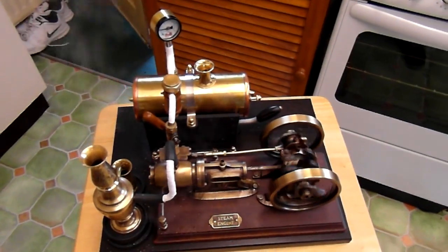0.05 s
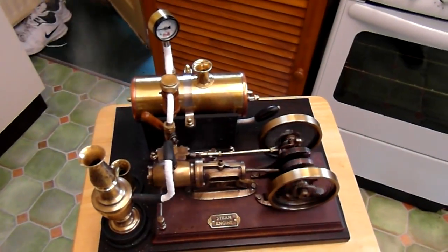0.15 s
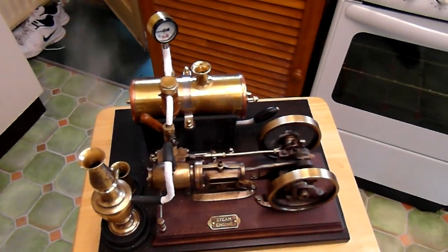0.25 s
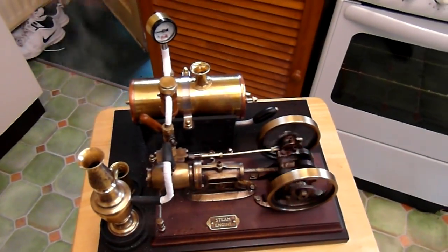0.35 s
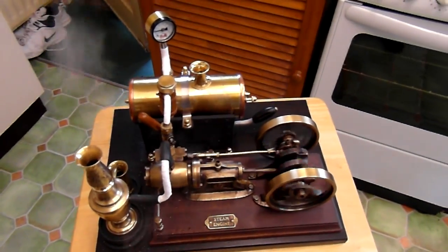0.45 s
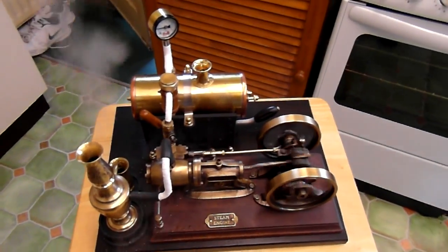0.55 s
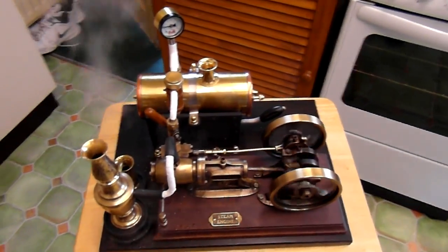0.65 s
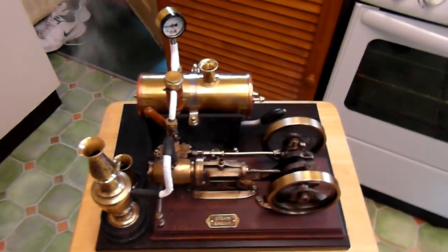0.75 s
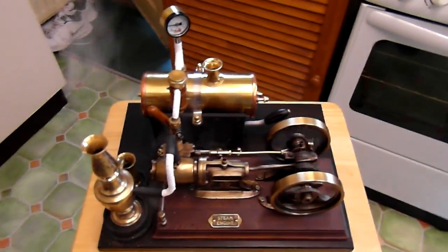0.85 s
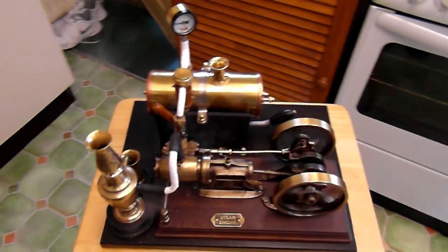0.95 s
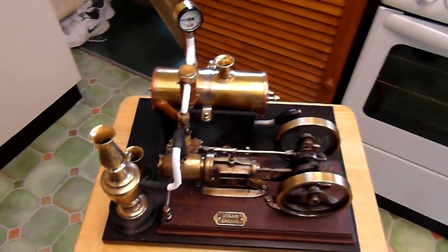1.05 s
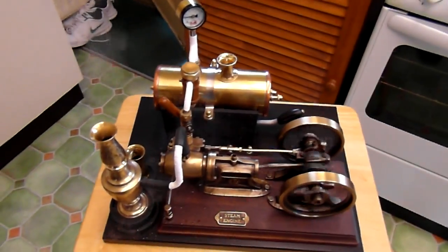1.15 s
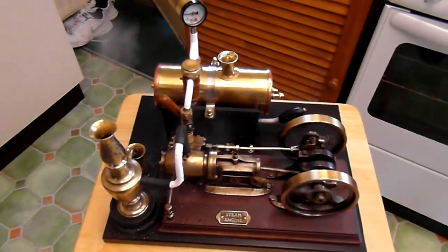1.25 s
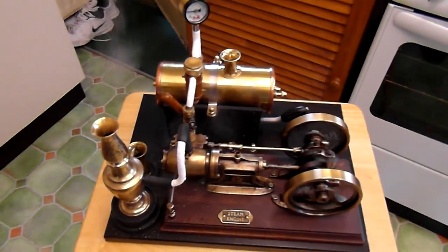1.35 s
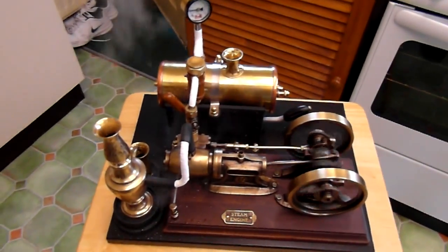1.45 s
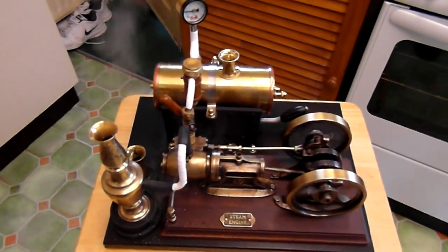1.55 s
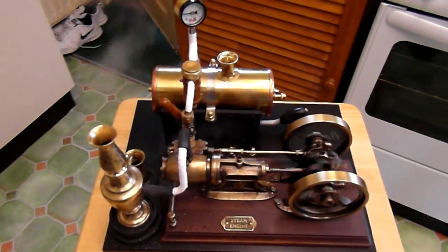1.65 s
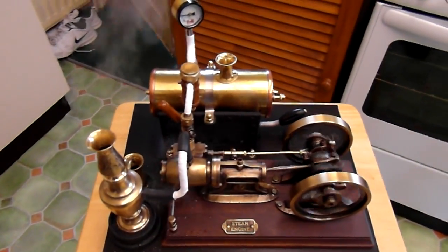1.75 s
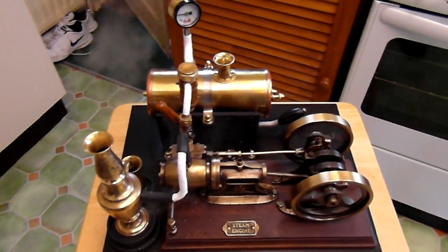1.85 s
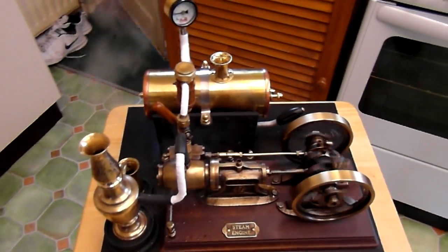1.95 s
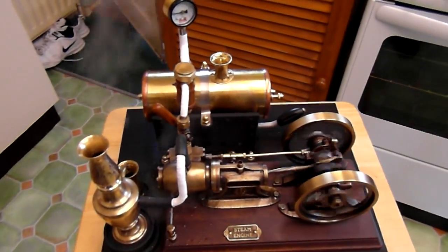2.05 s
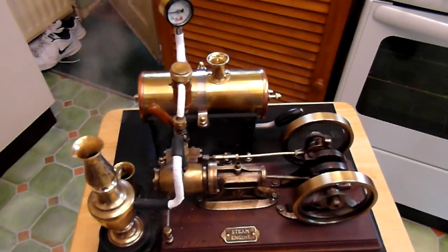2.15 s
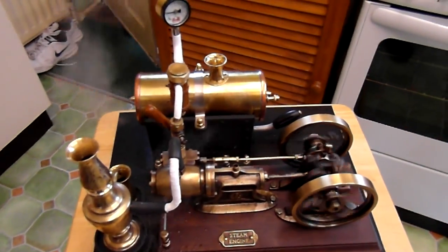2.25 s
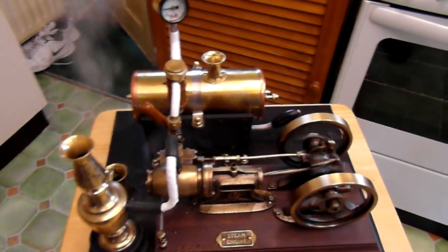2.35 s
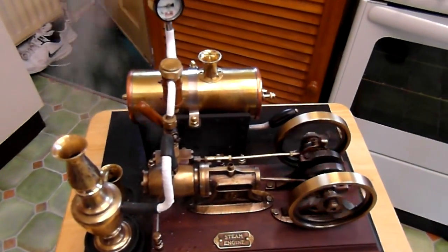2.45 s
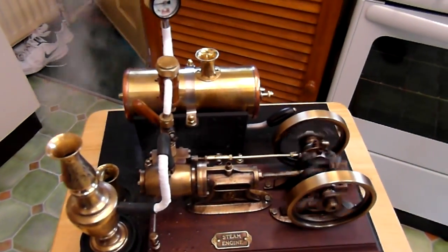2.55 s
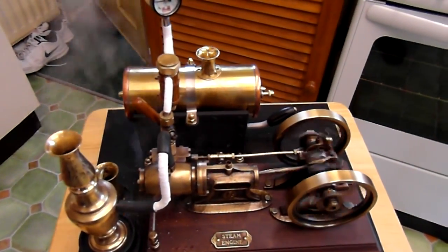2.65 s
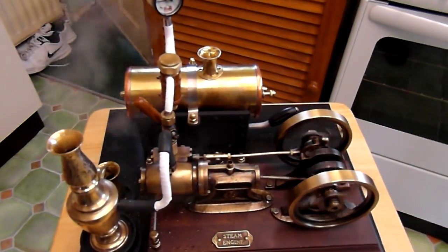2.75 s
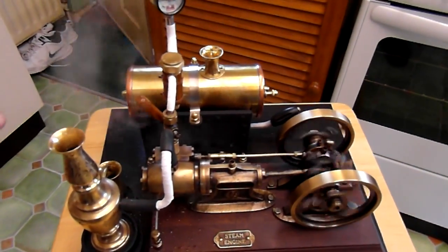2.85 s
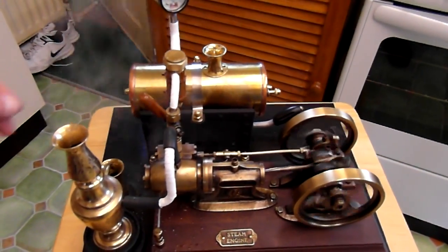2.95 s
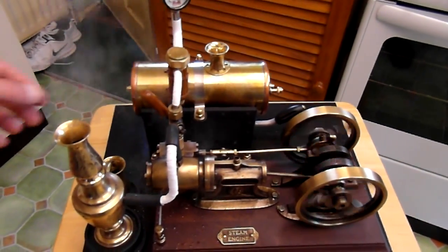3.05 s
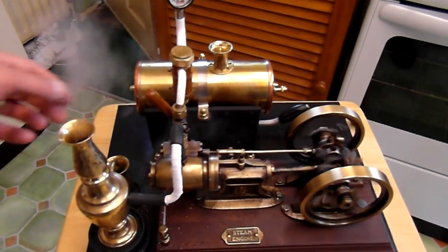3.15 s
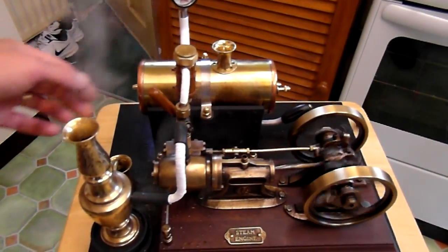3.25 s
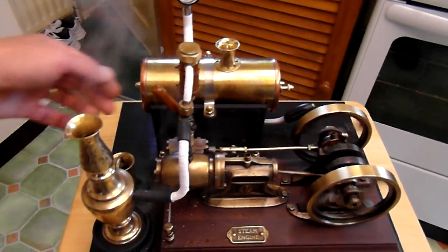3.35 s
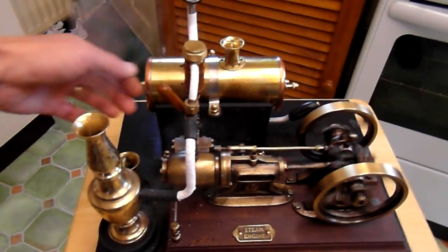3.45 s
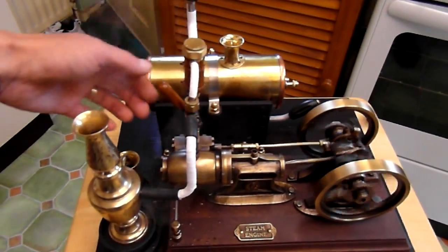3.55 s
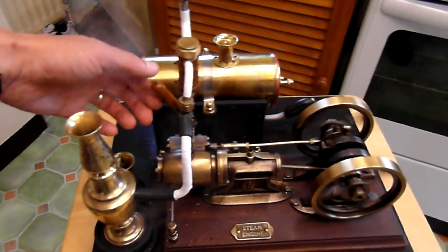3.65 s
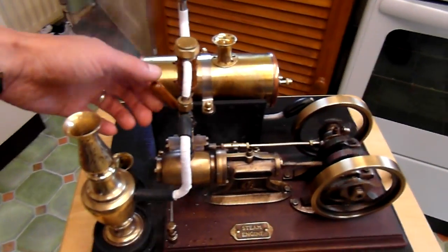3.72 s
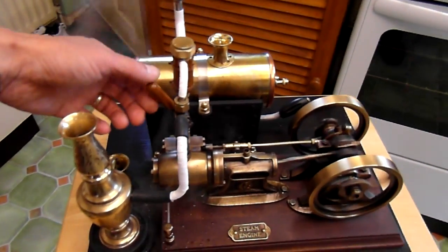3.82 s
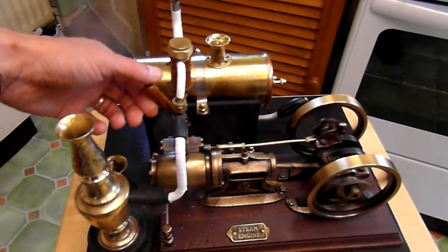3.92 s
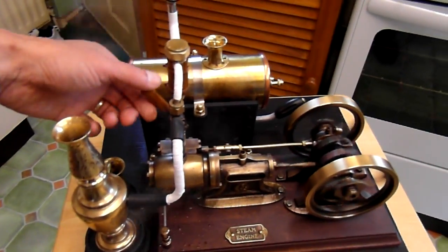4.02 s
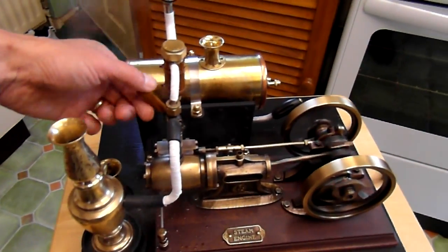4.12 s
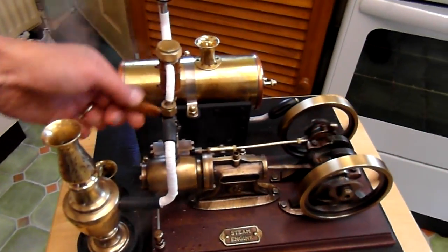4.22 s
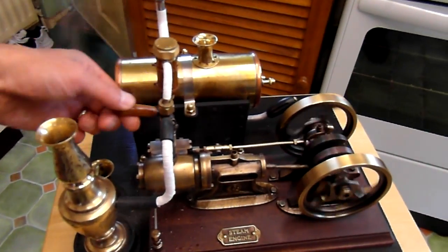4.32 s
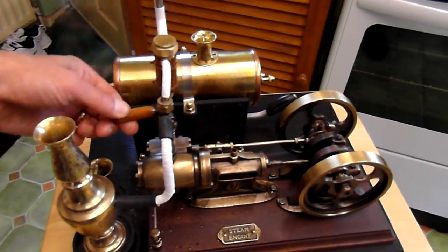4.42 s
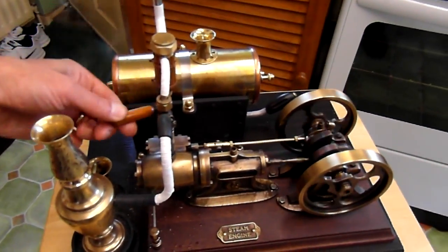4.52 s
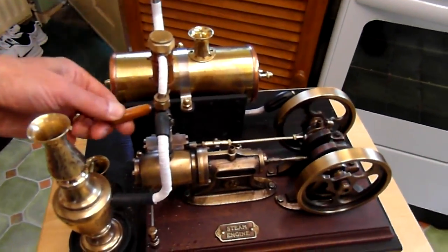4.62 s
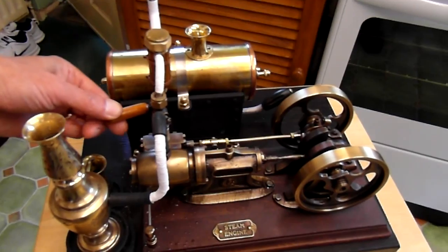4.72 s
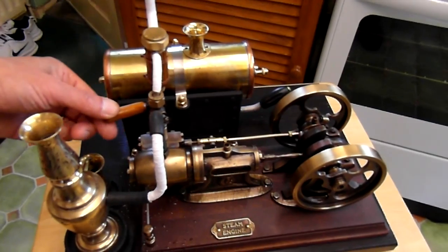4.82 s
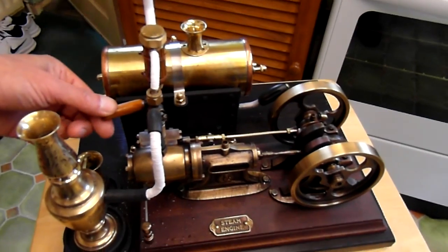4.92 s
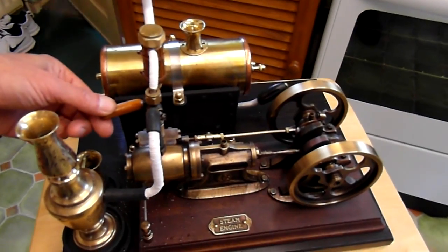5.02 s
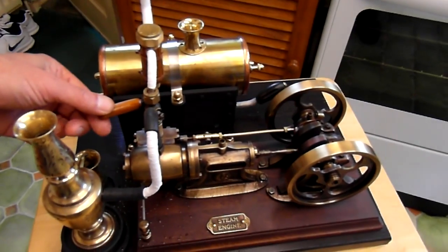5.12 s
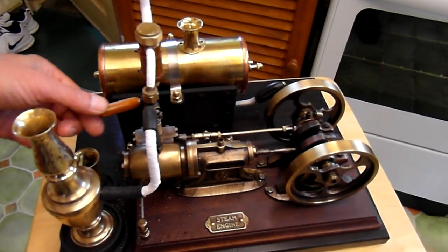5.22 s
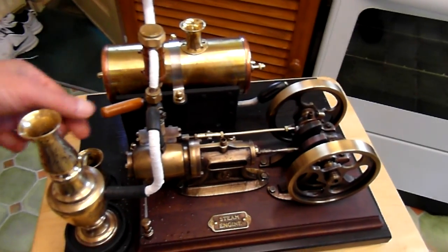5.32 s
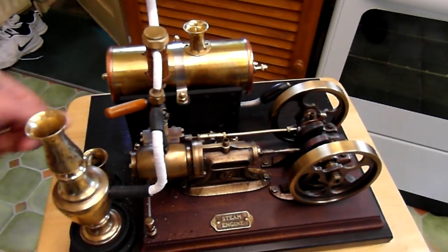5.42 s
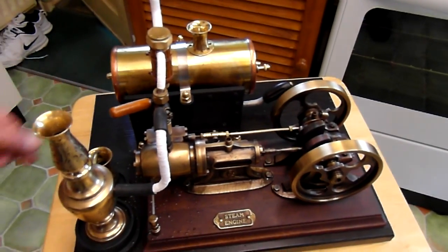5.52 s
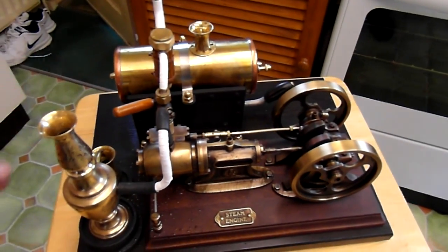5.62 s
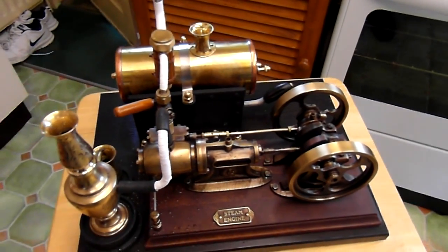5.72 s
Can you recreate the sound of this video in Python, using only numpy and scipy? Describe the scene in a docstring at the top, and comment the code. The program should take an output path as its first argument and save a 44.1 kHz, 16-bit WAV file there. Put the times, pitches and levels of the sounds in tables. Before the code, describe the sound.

Quick wet puffs of steam and ringing metal clatter from a miniature steam engine, which suddenly halts with a tiny squeak.

```python
"""A quiet kitchen, with a model steam engine running close by on the table at about 200 turns a minute.
Each turn the slide valve blows a short and a long chuff of wet steam up the brass chimney.
Slack bearings knock at each reversal and ring the frame, the rods rub, and the hollow wooden bed hums.
The throttle is closed, the flywheels rub to a halt with a small squeak, and only room tone is left."""
import sys
import numpy as np
from scipy import signal
from scipy.fft import rfft, irfft, next_fast_len
from scipy.io import wavfile
from scipy.ndimage import uniform_filter1d, map_coordinates

SR = 44100
rng = np.random.default_rng(int(sys.argv[2]) if len(sys.argv) > 2 else 0)


def persist_wave(psi):
    """Save psi, clipped to +-1, as 16-bit WAV."""
    counts = np.round(np.clip(psi, -1, 1) * 32767).astype(np.int16)
    wavfile.write(sys.argv[1], SR, np.atleast_2d(counts).T)


N = 254883
TIME = np.arange(N) / SR

# the crank's knock at dead centre, which starts each turn: t/s, relative click level/dB
CRANK_KNOCKS = [(0.2587, -19), (0.5438, -17), (0.833, -15), (1.1237, -14), (1.4177, -10), (1.7155, -7.5),
                (2.0121, -8.5), (2.3084, -4), (2.606, -10.5), (2.903, -6.5), (3.201, -12.5), (3.5029, -3.5),
                (3.8023, -4.5), (4.1038, -3)]


def exhaust():
    """Puffs of wet steam hiss and sputter through the resonances of the brass chimney."""
    # water drops spitting in the exhaust: t/s, level above the steam/dB
    spits = [(1.497, 2.5), (1.511, 7.5), (2.511, 1), (2.8645, 5.5), (3.893, 5)]
    # chimney resonances: f/Hz, width/Hz, relative level/dB
    chimney = [(397.6, 40, -4.5), (1977, 200, 0), (4014, 125, 4), (4280, 370, -10), (5933, 160, 2),
               (6380, 650, -6.5), (8820, 250, -2.5), (9340, 1400, -8), (10900, 200, -12), (11070, 700, -12)]
    # spectrum of the bare steam jet: f/Hz, relative level/dB
    jet_spectrum = [(30, -35), (120, -33), (300, -17), (510, -32), (1000, -13), (1500, -17), (2400, -20),
                    (3200, -43.5), (4600, -10.5), (5400, -16.5), (7000, -9), (8200, -17), (11500, -31.5)]
    flow = valve() * amp(.17 * TIME)  # the chuffs grow slowly
    sputter_db = 1.9 * wobble(350) + .6 * wobble(45)  # water makes the jet sputter
    sputter_db += sum(db * np.exp(-((TIME - s) / .0022) ** 2) for s, db in spits)
    jet = flow * amp(sputter_db) * rng.standard_normal(N)
    chuffs = unit(colour(jet, lambda hz: np.hypot(peaks(chimney, hz), amp(along(jet_spectrum, hz)))))
    # bursting bubbles ring the chimney's throat, fading as the water dries out
    bubbles = (rng.random(N) < 170 / SR) * rng.uniform(.95, 1, N)
    gurgle = unit(colour(flow * bubbles, lambda hz: peaks([(1925, 330, 0)], hz, steep=2.2)))
    # each sudden change of flow gives the air a low push
    push = unit(colour(np.gradient(flow), lambda hz: peaks([(174, 81, 0)], hz)))
    return amp(-30) * chuffs + amp(-36.5 - 1.5 * TIME) * gurgle + amp(-67) * push


def valve():
    """Steam flow: each port snaps open, holds and closes once a turn, until the throttle is shut."""
    # the slide valve's two exhaust ports: opening angle/turns, hold/turns, relative level/dB
    ports = [(.226, 0.091, 2.5), (0.653, 0.23, -1)]
    attack_turns, release_db_per_turn, leak_db = .013, 289, -24
    throttle_s, emptying_db_per_s = 4.26, 226.5
    angle = crank_angle()
    puffs = 0
    for opens, held, db in ports:
        since = (angle - opens) % 1
        attack = np.minimum(since / attack_turns, 1)
        puffs += attack * amp(db - release_db_per_turn * np.maximum(since - held, 0))
    steam_in_pipe = amp(-emptying_db_per_s * np.maximum(TIME - throttle_s, 0))
    return np.hypot(puffs * (TIME < throttle_s), amp(leak_db)) * steam_in_pipe


def knocks():
    """Slack in the bearings is taken up at every reversal, and the valve gear taps in between."""
    # valve gear taps: crank angle/turns, relative level/dB, contact cutoff/Hz
    taps = [(.72, -28, 7980), (.893, -24, 4975)]
    # the linkage clacks as it loses its drive: t/s, relative level/dB
    clacks = [(4.232, -21.5), (4.256, -18)]
    bounce_s, rebound_s = .0068, .022
    out = np.zeros(N)
    # dead centre: a bright knock, then two softer bounces of the bearing
    for s, click_db in CRANK_KNOCKS:
        db = -18.5 + .55 * s  # the frame's ring grows slowly
        add(out, s, amp(db) * blow(contact_hz=9400, crack_db=click_db - db - 10.5, swell_cycles=.87))
        for bounce, jitter in enumerate(rng.standard_normal(size=2)):
            delay = bounce_s * (bounce + 1 + .18 * jitter)
            soft_hit = blow(contact_hz=2620, crack_db=-7.5, swell_cycles=1.5)
            add(out, s + delay, amp(db - 10 - 2.5 * bounce) * soft_hit)
    # the piston turns back: a duller knock, then the crosshead falls back on its guide
    return_angle = .342 + .0039 * dead_centres()[:-1]  # a little later each turn
    for s in each_turn(return_angle):
        db = -20 + .06 * rng.standard_normal()
        add(out, s - .003, amp(db + 2) * crosshead())
        add(out, s - .003, amp(db - 9.5) * blow(contact_hz=5000, crack_db=-4.5, swell_cycles=2.5))
        add(out, s + rebound_s * (1 + .2 * rng.standard_normal()), amp(db - 5.5) * crosshead())
    for angle, db, contact_hz in taps:
        for s in each_turn(angle)[:-1]:
            strength = amp(db + 1.2 * rng.standard_normal())
            add(out, s, strength * blow(contact_hz, crack_db=-7, swell_cycles=1.2))
    for s, db in clacks:
        add(out, s, amp(db) * blow(contact_hz=4200, crack_db=3, swell_cycles=2.3))
    return out


def blow(contact_hz, crack_db, swell_cycles):
    """One blow cracks and rings the frame; a soft contact leaves out the high modes."""
    # modes of the engine frame: f/Hz, relative level/dB, t60/s
    frame_modes = [(434, -23, 0.13), (612, -28, 0.046), (734.4, -24, 0.11), (799, -15, 0.084),
                   (972.5, -7, 0.058), (1125, -13.5, 0.045), (1344, 0, 0.053), (1463, 1, 0.02),
                   (1561, -7.5, 0.097), (1610, -1.5, 0.012), (1980, 5, 0.012), (2340, -13, 0.014),
                   (2739, -2.5, 0.018), (3362, -6, .02), (4150, -8, 0.011), (4420, -4.5, .014),
                   (4546, -2.5, 0.024), (5114, -2, .012), (7630, 0.5, 0.0082), (7850, 5, 0.009)]
    t = np.arange(SR // 4) / SR
    hz, db, t60 = np.transpose(frame_modes)[:, :, None]
    decay = amp(db + 1.2 * rng.standard_normal(hz.shape) - 60 * t / t60)
    swell = 1 - np.exp(-t * hz / swell_cycles)
    polarity = (-1) ** np.arange(len(hz))[:, None]
    ring = np.sum(polarity * decay * swell * np.sin(2 * np.pi * hz * t), axis=0)
    burst = amp(crack_db - 60 * t / .015) * rng.standard_normal(len(t))
    crack = colour(burst, lambda f: f ** 2 / (f ** 2 + 1300 ** 2))  # low cut
    return colour(ring + crack, lambda f: 1 / np.hypot(1, (f / contact_hz) ** 2))


def crosshead():
    """On the return stroke the crosshead slaps its guide, a little differently each time."""
    # modes of the guide: f/Hz, relative level/dB, t60/s, attack/s
    guide_modes = [(967, -4.5, 0.019, 0.0021), (1156, -1.5, 0.041, 0.0012), (1262, 3.5, 0.042, 0.0036),
                   (1586, -7.5, 0.063, 0.02)]
    t = np.arange(SR // 4) / SR
    ring = np.zeros(len(t))
    for hz, db, t60, attack in guide_modes:
        pitch = hz * (1 + .018 * rng.standard_normal())
        strength = amp(db + 2 * rng.standard_normal())
        envelope = amp(-60 * t / t60) * (1 - np.exp(-t / attack))
        ring += strength * envelope * np.sin(2 * np.pi * pitch * t)
    return ring


def friction():
    """Rods and bearings rub and chatter, a dry bearing scrapes, and the shaft squeaks as it stops."""
    # loose parts chatter after each reversal or tap: crank angle/turns, level above the rub/dB
    chatter_onsets = [(0, 15.5), (.35, 10), (.72, 11.5), (.9, 12)]
    # spectrum of the sliding metal: f/Hz, relative level/dB
    rub_spectrum = [(40, -23), (130, -18.5), (280, -10), (560, -22.5), (900, -3.5), (1400, 5), (2000, 1.5),
                    (2600, -1.5), (4500, -17), (11500, -41)]
    # squeaks of the shaft rocking to rest: peak t/s, half length/s, level/dB
    squeaks = [(4.368, 0.0084, -41.5), (4.39, .018, -53)]
    decay_db_per_turn, scrape_angle, scrape_turns = 57, .63, .058
    angle, speed = crank_angle(), flywheel_speed()
    chatter = sum(amp(db - decay_db_per_turn * ((angle - at) % 1)) ** 2 for at, db in chatter_onsets)
    rub = amp(-44) * speed * np.sqrt(1 + chatter)
    coarse = noise(lambda hz: amp(along(rub_spectrum, hz)))
    swish = speed * noise(lambda hz: peaks([(4500, 9700, 0)], hz))
    dry_spot = amp(-42) * speed * np.exp(-((angle - scrape_angle) / scrape_turns) ** 2)
    scrape = dry_spot * noise(lambda hz: peaks([(2850, 1100, 0)], hz, steep=2))
    rocking = sum(amp(db) * np.exp(-((TIME - s) / half) ** 2) for s, half, db in squeaks)
    squeak = rocking * noise(lambda hz: peaks([(2000, 780, 0)], hz, steep=3.6))
    return rub * (coarse + amp(-4.5) * swish) + scrape + squeak


def bed_and_chimney():
    """The hollow bed hums and thumps at each dead centre; the chimney hoots with each chuff."""
    # resonances of the wooden bed: f/Hz, width/Hz, relative level/dB
    bed_modes = [(384.8, 18, 2.5), (422, 21, -8), (362, 75, -9), (266.6, 31, -24), (178, 24, -22),
                 (127.6, 10, -23)]
    # fader for hum, thump and hoot together: t/s, gain/dB
    fader = [(0.0, -44.5), (2.52, -44.5), (2.54, -40.5), (3.94, -41.5), (4.25, -41)]
    thump_hz, thump_t60_s = 379, .22
    fade_start_s, fade_db_per_s = 4.333, 230
    hum = noise(lambda hz: peaks(bed_modes, hz))
    hum /= np.sqrt(abs(uniform_filter1d(hum ** 2, size=SR // 8)) + 1e-6)  # a steady drive keeps it even
    swing = flywheel_speed() * np.cos(2 * np.pi * (crank_angle() - .12))  # one swell a turn
    hum *= amp(-3.5 + 1.5 * swing)
    t = np.arange(SR // 3) / SR
    envelope = amp(10.5 - 60 * t / thump_t60_s) * (1 - np.exp(-t / .0021))
    thump = envelope * np.sin(2 * np.pi * thump_hz * t)
    for s, _ in CRANK_KNOCKS:
        add(hum, s, thump)
    chimney_hoot = unit(valve() ** 2.2 * noise(lambda hz: peaks([(407.4, 50, 0)], hz, steep=2.34)))
    fader_db = np.interp(TIME, *np.transpose(fader))
    halt_db = fade_db_per_s * np.maximum(TIME - fade_start_s, 0)  # dies away as the engine halts
    return amp(fader_db - halt_db) * (hum + amp(-8) * chimney_hoot)


def kitchen(x, early_db, tail_db, positions=9):
    """Table and cupboards answer at once, then the room dies away; echoes shift as the listener moves."""
    # reverb time of the kitchen: f/Hz, t60/s
    reverb_times = [(150, 0.24), (500, 0.23), (2000, 0.26), (5000, 0.28), (11000, 0.096)]
    out = np.zeros((2, N))
    for place in range(positions):
        hz, t, grains = signal.stft(rng.standard_normal((2, SR // 2)), SR, nperseg=256)
        early = amp(early_db - 60 * t / .08)
        tail = amp(tail_db - 60 * t / along(reverb_times, hz)[:, None])
        response = signal.istft(grains * (early + tail), SR, nperseg=256)[1]
        response = np.pad(response, ((0, 0), (SR // 400, 0)))  # pre-delay
        crossfade = np.sqrt(np.maximum(1 - abs(np.linspace(0, positions - 1, N) - place), 0))
        out += signal.oaconvolve((crossfade * x)[None], response, axes=1)[:, :N]
    return diffuse(*out)


def room_tone():
    """Soft hiss with a faint hum and a thin whine."""
    # spectrum of the quiet room: f/Hz, relative level/dB
    hiss_spectrum = [(15, -58.5), (25, -26.5), (54, -14.5), (167, -12.5), (245, -7.5), (370, -5.5),
                     (399, -8), (466, -7), (1770, -10), (2060, -12.5), (11500, -18.5), (15000, -58.5),
                     (22000, -120)]
    # faint steady tones: f/Hz, relative level/dB
    steady_tones = [(64.6, -87), (403.7, -90), (786.0, -88), (1825, -79.5), (2584, -84)]
    mid, side = [noise(lambda hz: amp(along(hiss_spectrum, hz))) for _ in range(2)]
    tones = sum(np.sqrt(2) * amp(db) * np.sin(2 * np.pi * hz * TIME) for hz, db in steady_tones)
    return amp(-66.5) * diffuse(mid, side) + amp(-4.5) * tones


def diffuse(mid, side):
    """Stereo spread of the room: narrow in the midrange, wide in the bass and the top."""
    # stereo width: f/Hz, side level against mid/dB
    width = [(60, 0.5), (150, 3.5), (350, -9), (1000, -9), (2000, -6), (4000, -3), (9000, 0)]
    side = colour(side, lambda hz: amp(along(width, hz)))
    return np.array([mid + side, mid - side])


def dead_centres():
    """Times at which each turn begins, with one more turn at each end."""
    s = np.transpose(CRANK_KNOCKS)[0]
    return np.r_[2 * s[0] - s[1], s, 2 * s[-1] - s[-2]]


def crank_angle():
    """Position of the crank within its turn, 0 to 1."""
    starts = dead_centres()
    return np.interp(TIME, starts, np.arange(len(starts))) % 1


def each_turn(angle):
    """Times at which the crank passes an angle."""
    starts = dead_centres()
    return starts[:-1] + angle * np.diff(starts)


def flywheel_speed(stop_s=4.35, coast_s=.087):
    """Share of full speed: friction brings the flywheels to a halt."""
    return np.sqrt(np.clip((stop_s - TIME) / coast_s, 0, 1))


def amp(db):
    """Decibels to gain."""
    return 10 ** (np.asarray(db) / 20)


def unit(x):
    """Scaled to rms 1."""
    return x / np.sqrt(np.mean(x ** 2) + 1e-20)


def along(points, hz):
    """(f/Hz, value) points read on a log axis."""
    f, values = np.transpose(points)
    return np.interp(np.log(hz + 1), np.log(f), values)


def wobble(rate):
    """A smooth random curve, rate knots a second."""
    return map_coordinates(rng.standard_normal(int(N * rate / SR) + 4), [TIME * rate])


def peaks(modes, hz, steep=1.238):
    """Gain of (f/Hz, width/Hz, level/dB) resonances; steep sharpens their skirts."""
    power = 0
    for centre, width, db in modes:
        bell = (hz * width) ** 2 / ((centre ** 2 - hz ** 2) ** 2 + (hz * width) ** 2)
        power += amp(db) ** 2 * bell ** steep
    return np.sqrt(power)


def colour(x, gain):
    """Minimum-phase EQ whose gain is a function of frequency."""
    length = x.shape[-1]
    size = 2 * next_fast_len(length // 2 + 4096)
    cepstrum = irfft(np.log(np.maximum(gain(np.fft.rfftfreq(size, 1 / SR)), 1e-6)))
    cepstrum[1:size // 2] *= 2
    cepstrum[size // 2 + 1:] = 0
    return irfft(rfft(x, size) * np.exp(rfft(cepstrum)))[..., :length]


def noise(gain):
    """Coloured noise of rms 1."""
    return unit(colour(rng.standard_normal(N), gain))


def add(track, s, sound):
    """Mix a sound in at s seconds."""
    part = track[max(round(s * SR), 0):][:len(sound)]
    part += sound[:len(part)]


def scene():
    """The engine up close and a little to the right, with the kitchen around it."""
    engine = exhaust() + knocks() + friction() + bed_and_chimney()
    balance = amp([[-.4], [.4]])
    return balance * (engine + kitchen(engine, early_db=-42.5, tail_db=-38)) + room_tone()


def record(dry, left_lag_s=2e-5, top_hz=11520):
    """The sound reaches the left side a hair later, and a steep high cut takes off the top."""
    size = next_fast_len(N + 8192)
    hz = np.fft.rfftfreq(size, 1 / SR)
    spectrum = rfft(dry, size) * np.exp(-2j * np.pi * hz * np.array([[left_lag_s], [0]]))
    return irfft(spectrum / np.hypot(1, (hz / top_hz) ** 120), size)[:, :N]


dry = scene()
out = record(dry)
persist_wave(out)
```